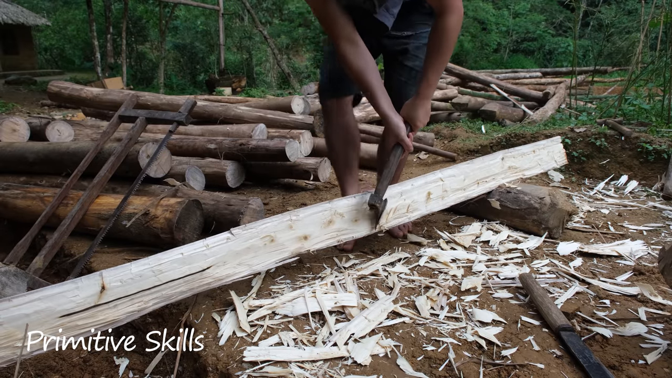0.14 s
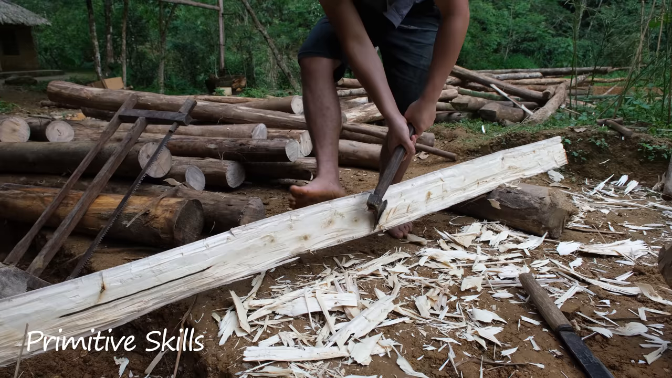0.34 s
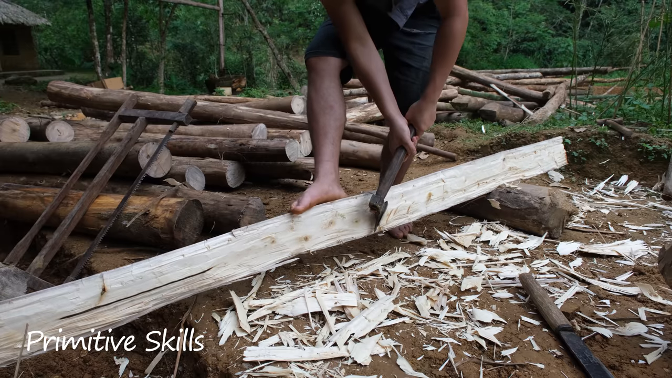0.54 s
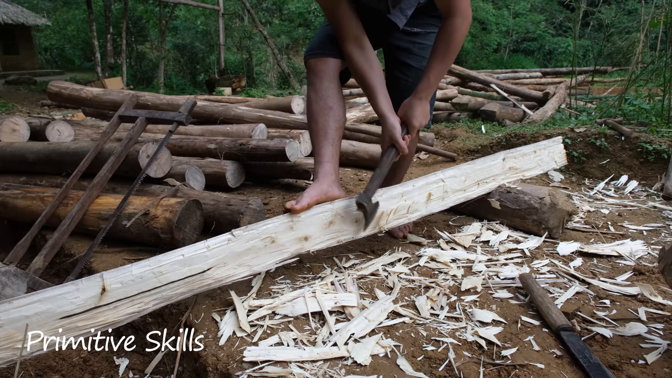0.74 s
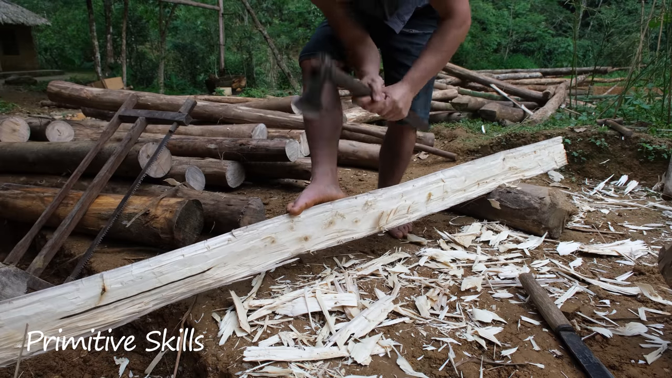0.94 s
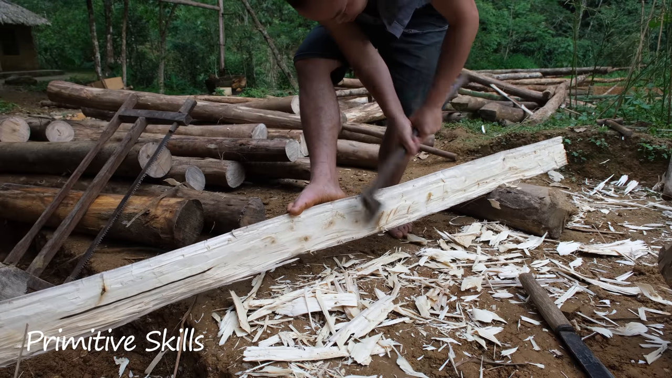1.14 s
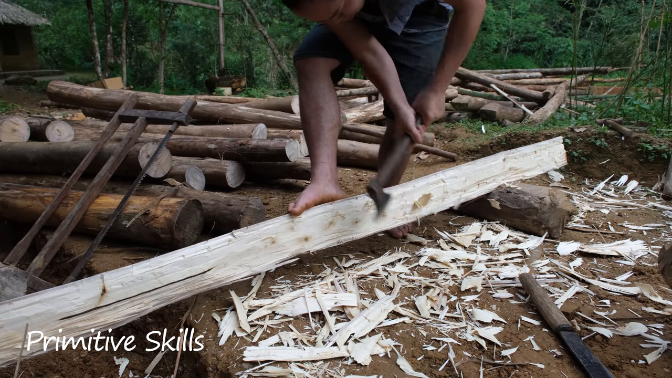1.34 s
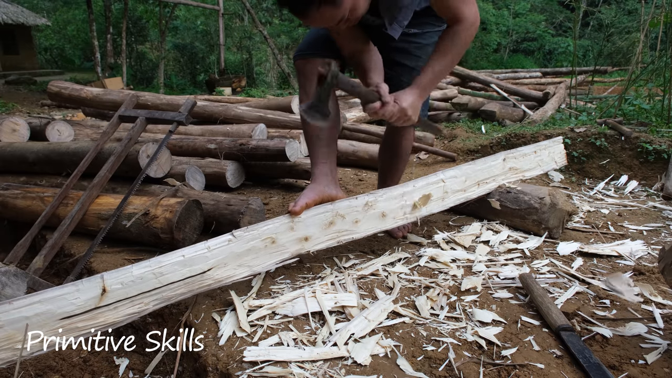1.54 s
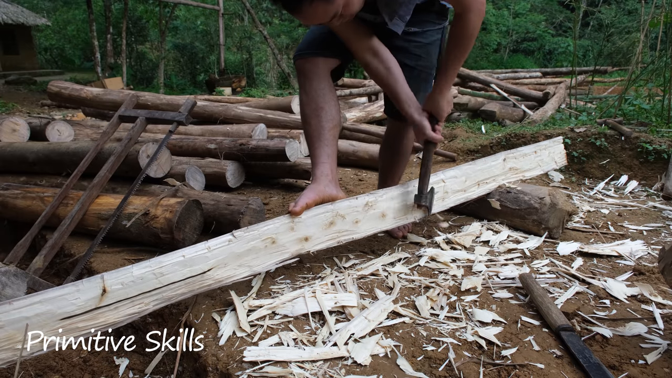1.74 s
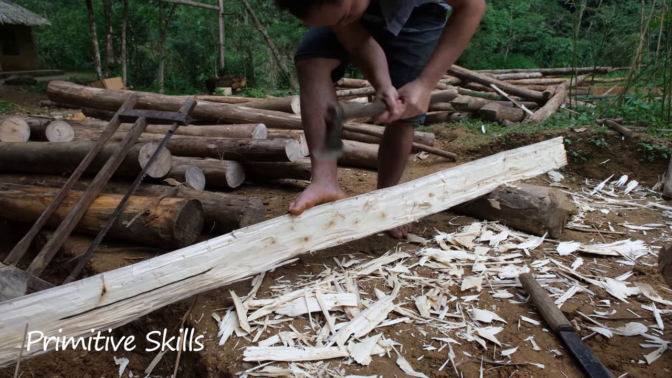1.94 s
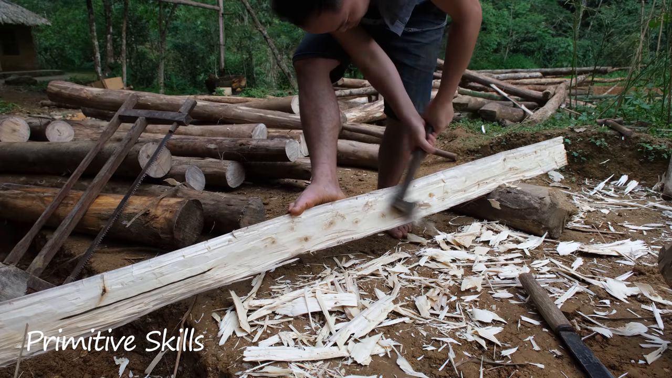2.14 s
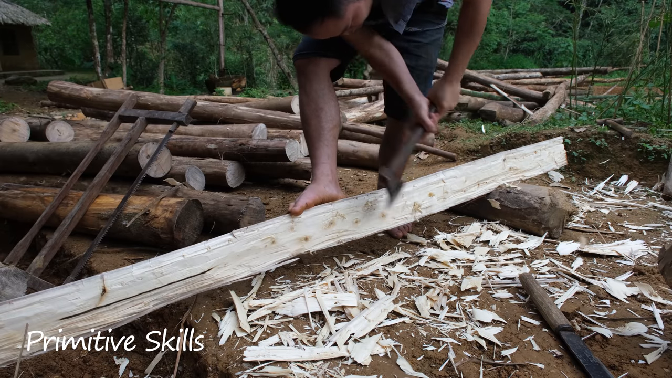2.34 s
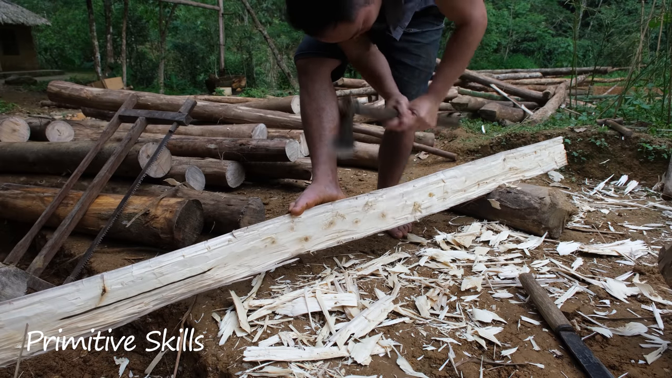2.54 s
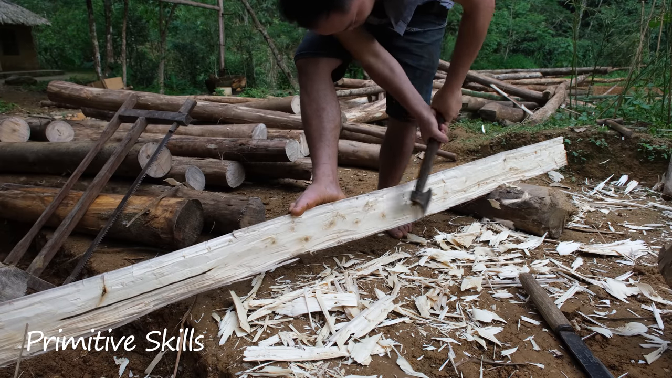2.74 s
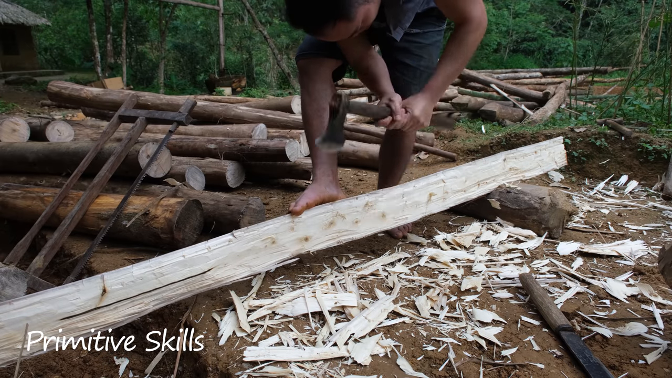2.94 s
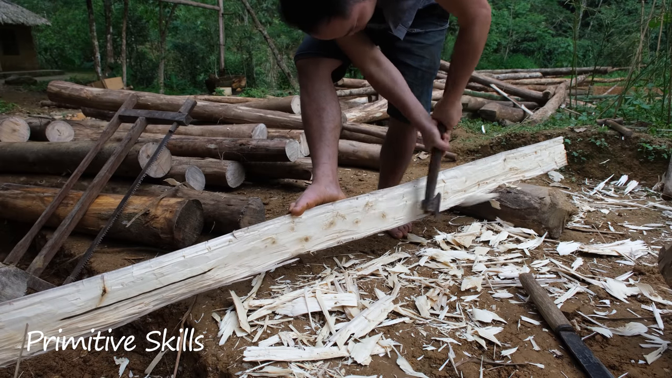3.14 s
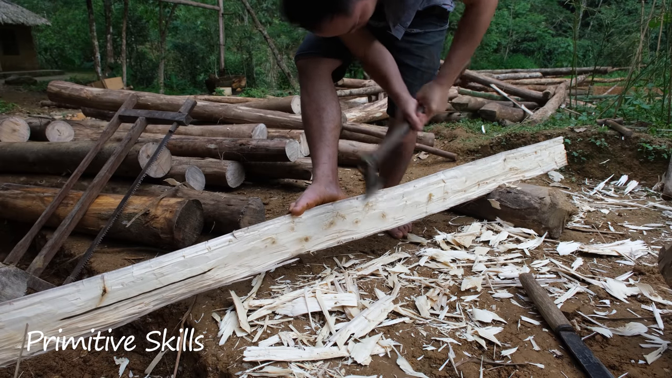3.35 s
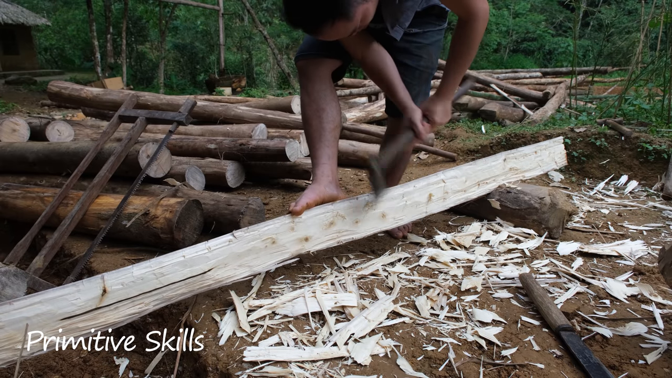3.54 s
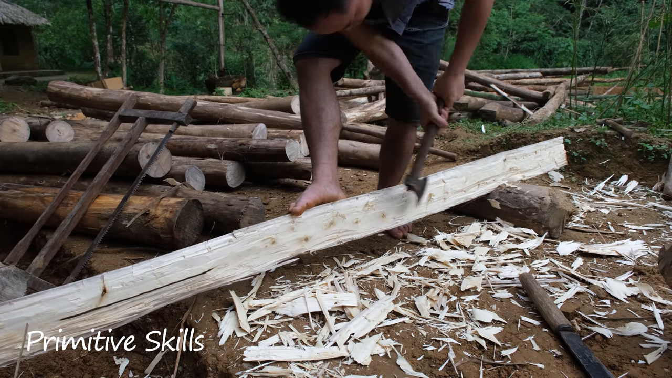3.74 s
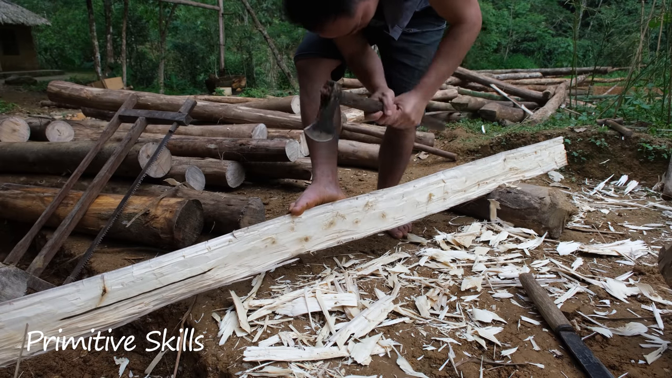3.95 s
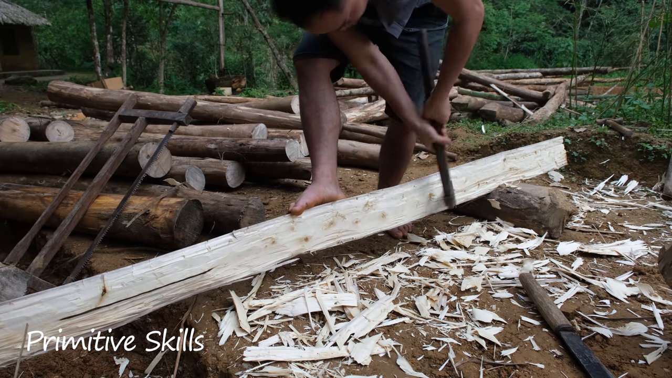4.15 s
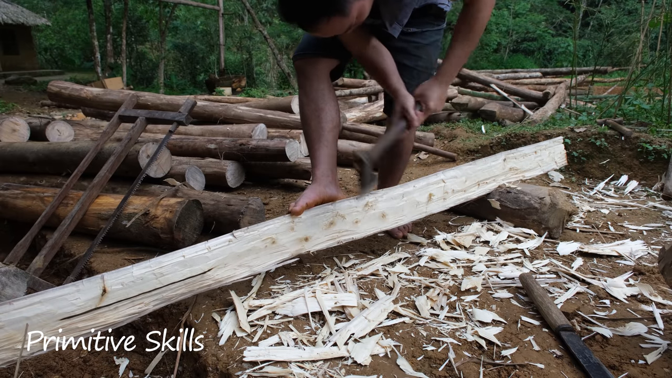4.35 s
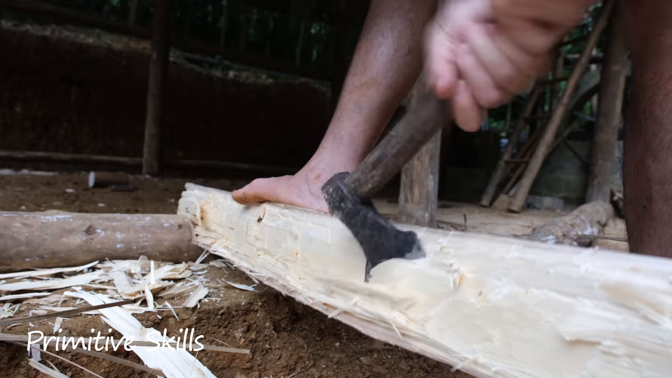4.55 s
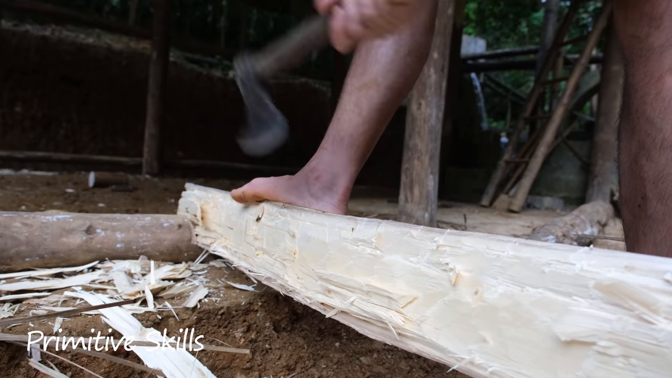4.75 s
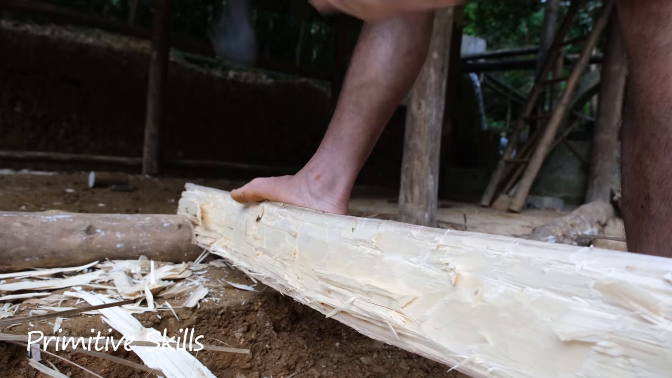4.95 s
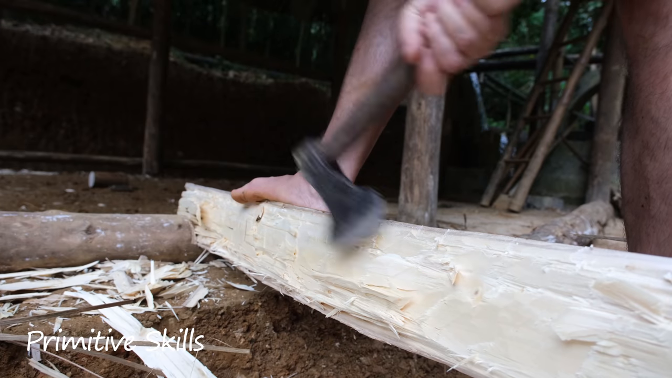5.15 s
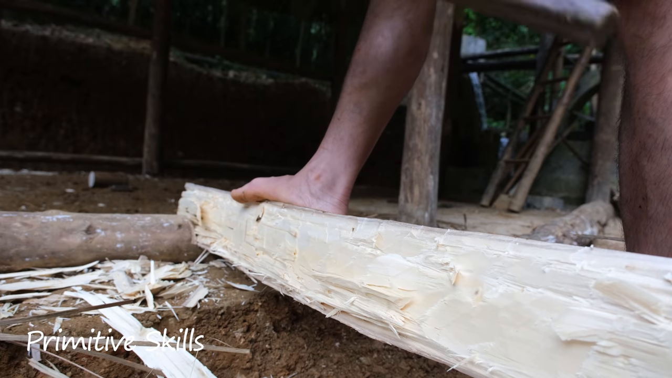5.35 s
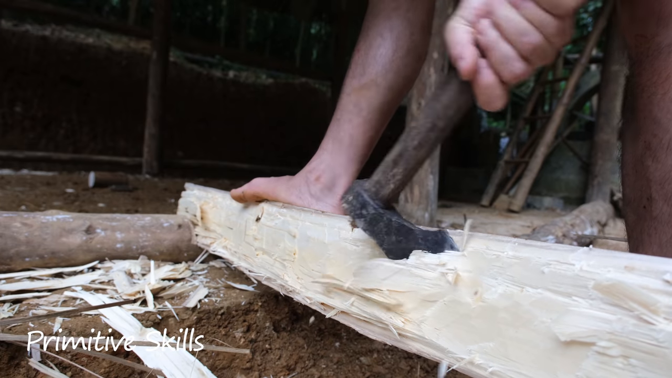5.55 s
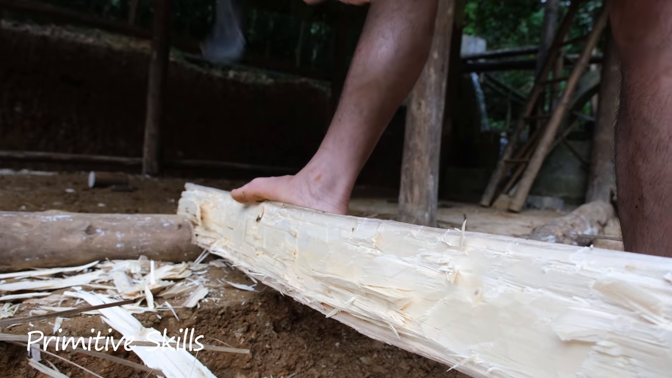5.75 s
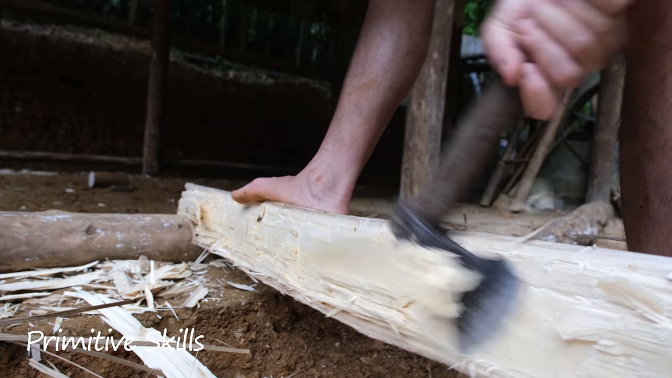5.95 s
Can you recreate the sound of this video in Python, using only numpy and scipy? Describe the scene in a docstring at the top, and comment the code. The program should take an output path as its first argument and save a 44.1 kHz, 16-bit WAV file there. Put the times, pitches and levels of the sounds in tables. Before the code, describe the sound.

An axe hews a wooden beam outdoors in steady half-second chops, hollow woody knocks with splintering chips, then the last four blows louder and closer.

```python
"""An axe hews a long beam in a forest clearing, a blow every half second, over a stream rushing far off. Each
blow swishes, thuds as a decaying swing of wood, rings the beam's modes and tears fibres as noise bursts; light
knocks ring the beam too, and chips tick as short noise rattles. Trunks scatter the sound, an insect whirrs. The
scene changes for the last four blows: they are heard from close by, where the ground shakes the microphone
harder. The recorder overloads, pulls its gain down a few milliseconds late and lets it recover more slowly."""
import sys
import numpy as np
from scipy import signal
from scipy.io import wavfile
from scipy.ndimage import uniform_filter1d

SR = 44100
rng = np.random.default_rng(int(sys.argv[2]) if len(sys.argv) > 2 else 0)


def persist_wave(psi):
    """Save psi, clipped to +-1, as 16-bit WAV."""
    counts = np.round(np.clip(psi, -1, 1) * 32767).astype(np.int16)
    wavfile.write(sys.argv[1], SR, np.atleast_2d(counts).T)


def boost_factor(decibels):
    """Convert a level in decibels to a linear amplitude factor."""
    exponent = np.asarray(decibels, float) / 20
    return 10 ** exponent


N = 265041
CUT_S = 4.515  # the scene changes here; from now on the blows are heard from close by


def rms_one(x):
    """Scales to unit power."""
    return x / np.sqrt(np.mean(x ** 2) + 1e-20)


def band(x, low_hz, high_hz):
    """Second-order Butterworth band-pass."""
    edges_hz = np.clip([low_hz, high_hz], 10, 19000)
    return signal.sosfilt(signal.butter(2, edges_hz, "band", fs=SR, output="sos"), x)


def fade(t60, seconds):
    """Time axis and an exponential decay that falls 60 dB in t60 seconds."""
    t = np.arange(int(seconds * SR)) / SR
    return t, boost_factor(-60 * t / t60)


def add(track, s, sound):
    """Mixes a short sound into the track at s seconds."""
    i = round(s * SR)
    track[i:i + len(sound)] += sound[:N - i]


def drift(rate):
    """Slow chance: normal draws of spread 1, rate per second, joined by straight lines."""
    steps = rng.standard_normal(int(rate * N / SR) + 2)
    return np.interp(np.arange(N) * rate / SR, np.arange(len(steps)), steps)


# spectrum of the stream from the first, distant standpoint: (f/Hz, relative level/dB per Hz)
STREAM_FROM_AFAR = [(18, -69), (30, -47), (59, -36), (149, -4), (204, -11.5), (272, -6.5), (372, -8),
                    (567, -3), (613, -13), (681, -5), (818, 4.5), (1180, -6.5), (4160, -13.5),
                    (15900, -44.5)]
# spectrum of the stream from the second standpoint, beside the beam: (f/Hz, relative level/dB per Hz)
STREAM_FROM_BEAM = [(18, -39), (30, -9), (111, -16), (157, 5), (238, -10), (425, 3), (497, -17),
                    (567, -0.5), (737, -2.5), (885, 1), (1380, -5.5), (3370, -7), (15900, -34)]


def stream(spectrum, patchy_db):
    """Rushing water: third-octave noise bands that each flicker, a little in step."""
    out = 0
    together = drift(3.0)
    edges_hz = 25 * 2 ** np.arange(0, 9.5, 1 / 3)
    white = rng.standard_normal((2, N))
    hz, level_db = np.transpose(spectrum)
    for k, (low, high) in enumerate(zip(edges_hz, edges_hz[1:])):
        gain_db = np.interp(np.log(low * high) / 2, np.log(hz), level_db)
        flicker_db = patchy_db * (0.43 * together + drift(26.0))
        # neighbouring bands draw on different noise
        out = out + boost_factor(gain_db + flicker_db) * band(white[k % 2], low, high)
    return rms_one(out)


def hiss(near):
    """Steady white noise, 5.3 dB stronger at the near standpoint."""
    return boost_factor(-65 + 5.3 * near) * rng.standard_normal(N)


# sway of what carries the microphone: (f/Hz, typical level/dB within the jolt, t60/s)
MICROPHONE_SWAY = [(27, -2, 0.61), (64.5, -3.5, .8)]


def ground():
    """Earth under the microphone murmurs; each blow jolts it and sways the support, more from close by."""
    out = boost_factor(-71.5) * rms_one(band(rng.standard_normal(N), 20, 70))
    for s, *_ in AXE_BLOWS:
        t, decay = fade(0.45, seconds=.5)
        shudder = decay * rms_one(band(rng.standard_normal(len(t)), 25, 180))
        chances = rng.standard_normal((len(MICROPHONE_SWAY), 2))
        for (hz, level_db, t60), chance in zip(MICROPHONE_SWAY, chances):
            swing = fade(t60, seconds=.5)[1] * np.sin(2 * np.pi * hz * t + chance[1])
            shudder = shudder + boost_factor(level_db + 2.8 * chance[0]) * swing
        jolt_db = -30 if s > CUT_S else -49
        add(out, s, boost_factor(jolt_db) * shudder * np.clip((.5 - t) * 10, 0, 1))
    return out


# ringing modes of the beam: (f/Hz, relative level/dB, t60/s when undamped)
BEAM_MODES = [(217, -7.5, 0.18), (257.2, -19.5, 0.29), (378, -12.5, 0.23), (479.6, 1, .22),
              (611.7, 2, 0.15), (787, 0, 0.081), (816, -5, 0.16), (891, 1.5, 0.096), (955, -20, 0.085),
              (1032, -0.5, 0.12), (1392, -6, 0.12), (1480, -13, 0.14), (1733, 3.5, .08), (2020, -47, 0.083),
              (2120, -11, .06)]


def beam_ring(spot_hz, reach, rise_s, sustain):
    """Modes near the pitch of the struck spot speak best; countless small ones blur into a woody wash."""
    hz, level_db, t60 = np.transpose(BEAM_MODES)[:, :, None]
    t, wash_decay = fade(0.1, seconds=.25)
    chance = rng.standard_normal((2, len(BEAM_MODES), 1))
    # reach, in octaves, is the distance at which a mode speaks 2.6 dB weaker
    octaves_off = np.log2(hz / spot_hz)
    strength_db = level_db + 2.93 * chance[0] - 2.6 * (octaves_off / reach) ** 2
    decaying = boost_factor(strength_db - 60 * t / (t60 * sustain))
    modes = -decaying * np.sin(2 * np.pi * hz * t + 0.73 * chance[1])
    edges_hz = spot_hz * 2 ** (reach * np.array([-1.2, 1.5]))
    wash = rng.standard_normal(len(t))
    wash = rms_one(band(band(wash, *edges_hz), *edges_hz))
    ring = modes.sum(axis=0) + boost_factor(-1.0) * reach * wash_decay * wash
    return ring * (1 - np.exp(-t / rise_s))


# lighter knocks on the beam, by foot, rebounding blade or a splitting slab that chatters:
# (t/s, level/dB, f/Hz of the spot touched)
BEAM_KNOCKS = [(0.002, -34, 478), (0.530, -35.5, 478), (0.544, -34, 478), (1.229, -4.5, 526),
               (1.7315, -13, 565), (2.217, -14, 563), (3.638, -7, 680), (3.644, -3.5, 684),
               (3.653, -18, 677), (3.662, -6.5, 735), (3.672, -17.5, 700), (3.677, -18.5, 720)]


def knocks():
    """Light touches ring the same beam in a narrower range; softer ones sound purer."""
    out = np.zeros(N)
    for s, level_db, spot_hz in BEAM_KNOCKS:
        reach = max(.1, .52 + .0105 * level_db)
        add(out, s, boost_factor(level_db) * beam_ring(spot_hz, reach, rise_s=0.00033, sustain=0.7))
    return out


# the loudest chips that snap off or land: (t/s, level/dB, f/Hz)
LOUD_CHIPS = [(1.2055, -26.5, 4000), (1.222, -18, 4500), (1.240, -21, 5000), (1.255, -21, 3970),
              (1.391, -31.5, 1250), (1.531, -39, 4960), (1.690, -35, 910), (1.722, -26, 3400),
              (1.736, -20, 3500), (1.7438, -9.5, 3500), (2.205, -8.5, 5070), (2.228, -23, 3000),
              (2.776, -36, 2000), (3.613, -31.5, 1300), (4.166, -23, 2200), (4.172, -32, 4160),
              (4.192, -33, 4000), (4.492, -38.5, 850), (5.106, -19.5, 5500)]
# soft rubs of foot and shavings: (t/s, level/dB, f/Hz)
SOFT_RUBS = [(0.470, -40, 855), (0.520, -43, 2500), (1.974, -47.5, 3200), (3.03, -44, 2840)]


def chips():
    """Chips and rubs are small dying rattles around their own pitch, with a brighter edge."""
    out = np.zeros(N)
    # each knock cracks a sliver
    ticks = LOUD_CHIPS + [(s, level_db - 10.5, 2930) for s, level_db, _ in BEAM_KNOCKS]
    # three small slivers after each blow come at random, fainter the later they land
    for s, *_ in AXE_BLOWS:
        for early, size, pitch in rng.random((3, 3)):
            wait_s = .012 - 0.085 * np.log(1 - early)
            sliver_db = -35 - 60 * wait_s - 8.0 * size
            sliver_hz = 4200 * 2 ** (pitch - .5)
            ticks.append((s + wait_s, sliver_db, sliver_hz))
    # a chip decays by 60 dB in 81 cycles, a rub in 0.33 s; both are cut off at 69 ms
    events = [(s, level_db, hz, 81 / hz) for s, level_db, hz in ticks]
    events += [(*rub, 0.33) for rub in SOFT_RUBS]
    for s, level_db, hz, t60 in events:
        t, decay = fade(t60, seconds=0.069)
        noise = rng.standard_normal(len(t))
        body = rms_one(band(noise, hz / 1.62, hz * 1.32))
        edge = 0.18 * rms_one(band(noise, hz, hz * 4.0))
        onset = 1 - np.exp(-t / 0.00023)
        if s < N / SR:
            add(out, s, boost_factor(level_db) * decay * (body + edge) * onset)
    return out


def trees(x):
    """Trunks and log piles around the clearing return a dull, dense, quickly dying scatter."""
    t, decay = fade(0.18, seconds=.4)
    scatter = band(rng.standard_normal(len(t)), 125, 1800) * decay * (t > .008)
    return boost_factor(-31.0) * signal.fftconvolve(x, scatter / np.sqrt(np.sum(scatter ** 2)))[:N]


# axe blows: (t/s, thud level/dB, thud f/Hz at first touch, blade contact/ms, tearing level/dB)
AXE_BLOWS = [(1.208, 12, 607, 3.9, -12), (1.7059, 8, 623, 3.9, -13), (2.1875, 17.5, 669.7, 7.1, -11),
             (2.673, 9.5, 649, 4.46, -6.5), (3.1408, 7.5, 693, 4.4, -8), (3.6240, 6.5, 664, 2.76, -16.5),
             (4.1229, 13, 619, 9.5, -15.5), (4.5877, 15.5, 869.5, 6.85, -21),
             (5.0497, 21.5, 843, 8.46, -21), (5.5122, 20, 864, 6.75, -8.5), (5.9793, 20.5, 830, 7.2, 4.5)]


def swish():
    """The falling head pushes air, louder as it speeds up."""
    t, decay = fade(0.18, seconds=.2)
    air = rms_one(band(rng.standard_normal(len(t)), 630, 1200))
    return boost_factor(-44.0) * (decay * air)[::-1]


def thud(hz, contact_ms, near):
    """Wood under the blade swings, stiffening as the steel wedges in; glancing cuts shake it unevenly."""
    t, decay = fade(.052 if near else .04, seconds=.2)
    turns = hz * (t + 11.0 * np.minimum(t, contact_ms / 1000) ** 2)
    after_ms = 1000 * t - contact_ms
    uneven = (.3 if near else .5) * boost_factor(-np.clip(after_ms, 0, None))
    shake = rms_one(band(band(rng.standard_normal(len(t)), 321, 1350), 321, 1350))
    # a higher swing of the slab beats against the first, most on glancing cuts
    overtone = uneven * np.sin(2 * np.pi * 1.75 * turns + 1.0)
    swing = -np.sin(2 * np.pi * turns + 0.96) - overtone + 1.443 * uneven * shake
    # the square-struck end swings on when the blade lets go
    released_db = 3 if near else 20
    pressing = np.clip(t / 0.00097, 0, 1) * boost_factor(-np.clip(14.7 * after_ms, 0, released_db))
    return decay * swing * pressing


def tearing(near):
    """Fibres part in clumped bursts of noise."""
    t, decay = fade(.045 if near else .075, seconds=.2)
    noise = rng.standard_normal((2, len(t)))
    clumped = noise[1] * boost_factor(4.3 * rms_one(band(noise[0], 52, 220)))
    return decay * rms_one(band(clumped, 1600, 6000) + .12 * clumped)


def blows():
    """Swish, thud, ring and tearing of each stroke: mid-span at first, at the held end from close by."""
    out = np.zeros(N)
    for s, thud_db, thud_hz, contact_ms, tear_db in AXE_BLOWS:
        near = s > CUT_S
        rush = swish()
        add(out, s - len(rush) / SR, rush)
        add(out, s, boost_factor(thud_db) * thud(thud_hz, contact_ms, near))
        # the beam rings under the thud; a foot on its end damps it
        ring_db = thud_db - (25 if near else 20)
        ring_hz = thud_hz * (0.9 if near else 0.91)
        reach, sustain = (.68, .5) if near else (.75, 1)
        add(out, s, boost_factor(ring_db) * beam_ring(ring_hz, reach, rise_s=0.0014, sustain=sustain))
        add(out, s + 0.001098, boost_factor(tear_db) * tearing(near))
    return out


def insect():
    """A faint narrow whirr in the trees that sets in late and wavers."""
    whirr = rms_one(band(rng.standard_normal(N), 6500 - 130, 6500 + 130))
    onset = np.clip((np.arange(N) / SR - 3.3) / 0.25, 0, 1)
    return boost_factor(-70 + 1.7 * drift(4.0)) * whirr * onset


def scene():
    """Work in front, water behind; the scene changes once."""
    # the work carries little bass below 150 Hz
    work = band(blows() + knocks() + chips(), 150, 18000)
    near = np.clip((np.arange(N) / SR - CUT_S) / 0.0019, 0, 1)
    far_place = boost_factor(-45) * stream(STREAM_FROM_AFAR, patchy_db=0.9) + insect()
    near_place = boost_factor(-39) * stream(STREAM_FROM_BEAM, patchy_db=2.2)
    surroundings = (1 - near) * far_place + near * near_place
    return (work + trees(work) + ground() + surroundings + hiss(near))[None]


def low_pass(x):
    """Removes everything above the highest recorded frequency."""
    return signal.sosfilt(signal.butter(12, 16010, fs=SR, output="sos"), x)


def record(dry):
    """Gain control that reacts a few ms late and recovers more slowly, then a hard ceiling."""
    t = np.arange(N) / SR
    level_db = 10 * np.log10(uniform_filter1d(dry[0] ** 2, size=128) + 1e-12)
    excess_db = np.clip(0.63 * (level_db + 17.5), 0, 17)
    # the cut is let go at 70 dB per second
    held_db = np.maximum.accumulate(excess_db + 70 * t) - 70 * t
    late_db = np.interp(t - .006, t, held_db)
    pole = np.exp(-1 / (0.0044 * SR))  # the gain glides with a 4.4 ms time constant
    cut_db = signal.lfilter([1 - pole], [1, -pole], late_db)
    mix = np.clip(dry * boost_factor(-cut_db), -1, 1)
    return low_pass(mix)


dry = scene()
out = record(dry)
persist_wave(out)
```